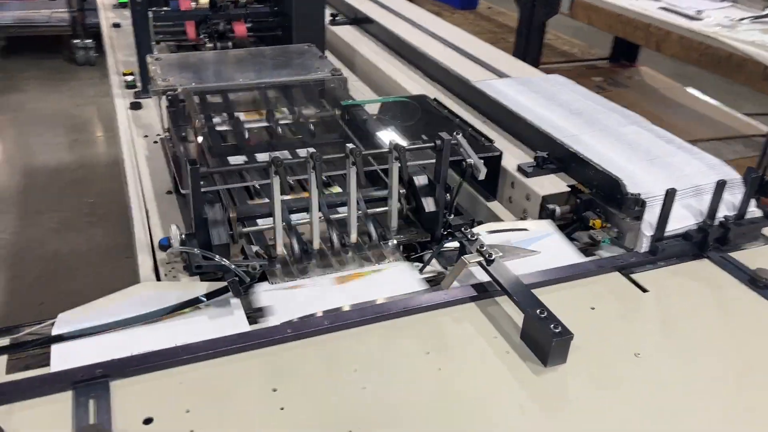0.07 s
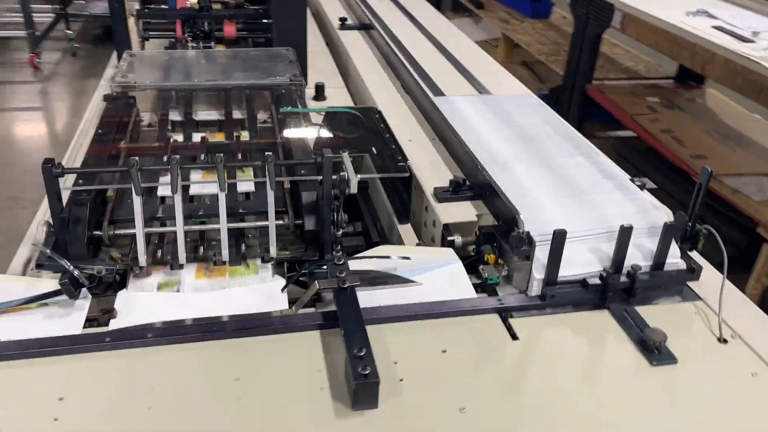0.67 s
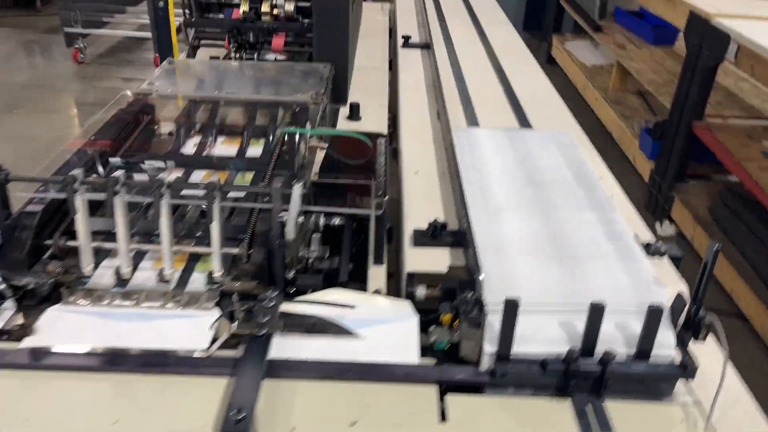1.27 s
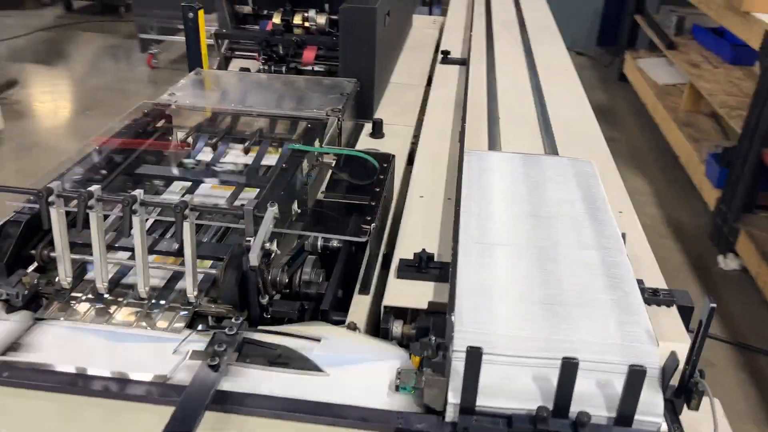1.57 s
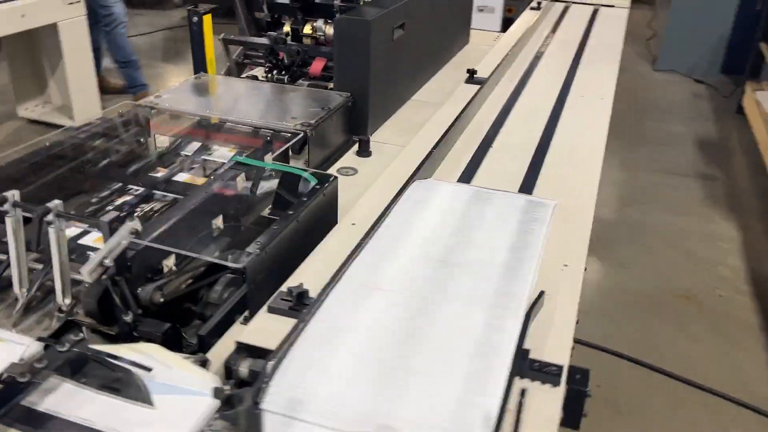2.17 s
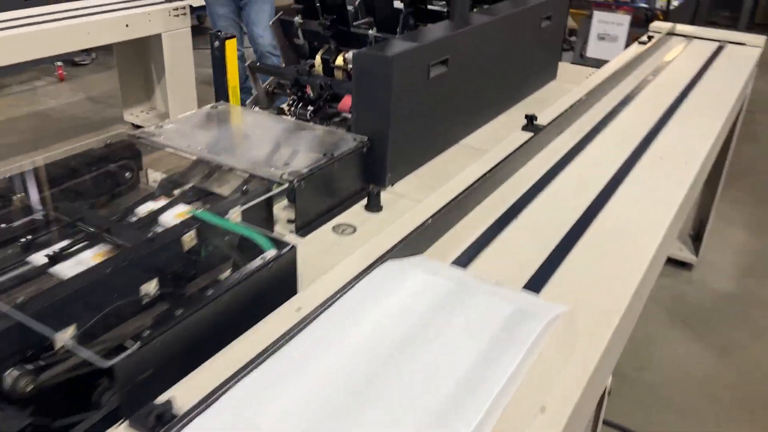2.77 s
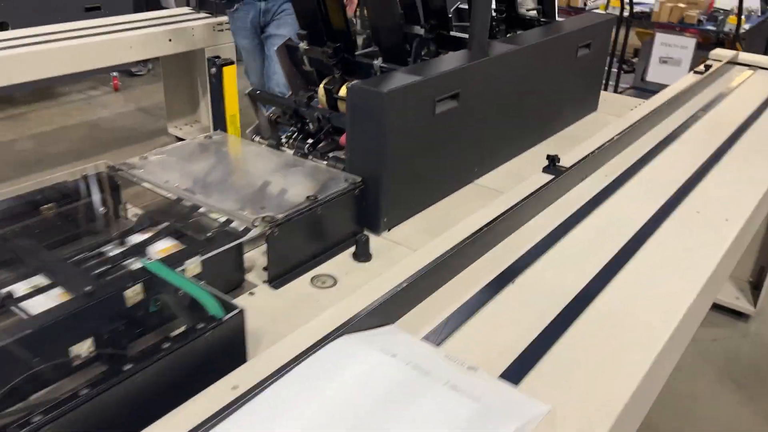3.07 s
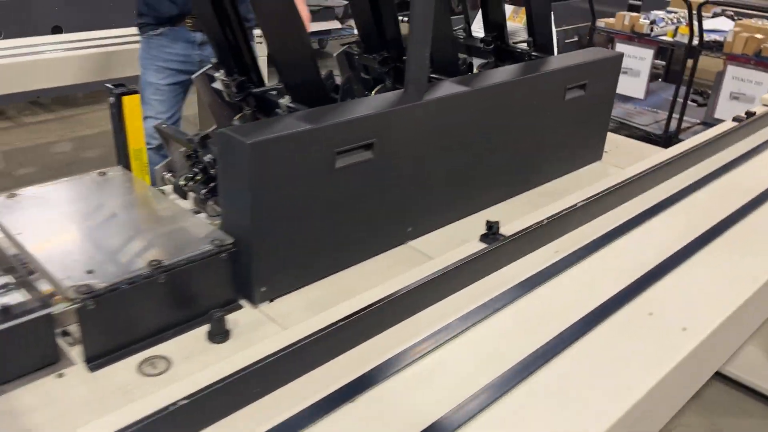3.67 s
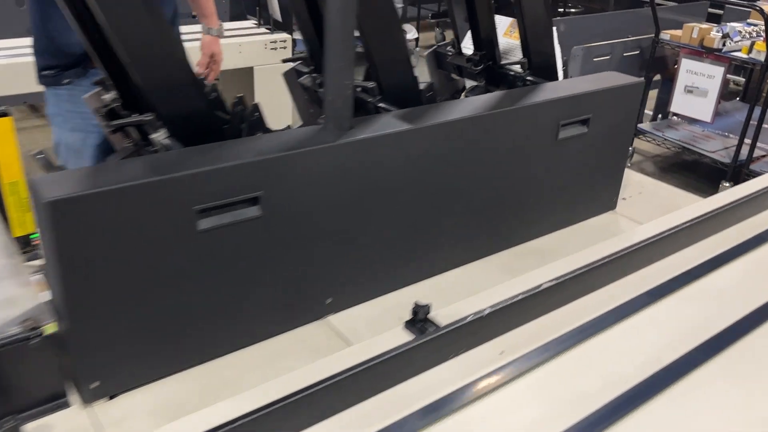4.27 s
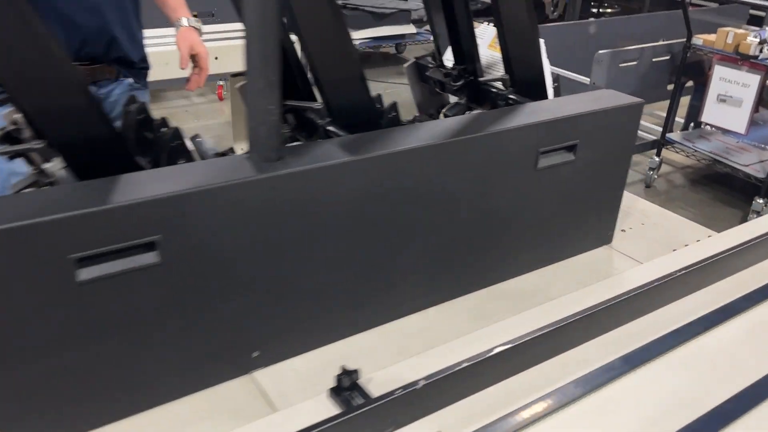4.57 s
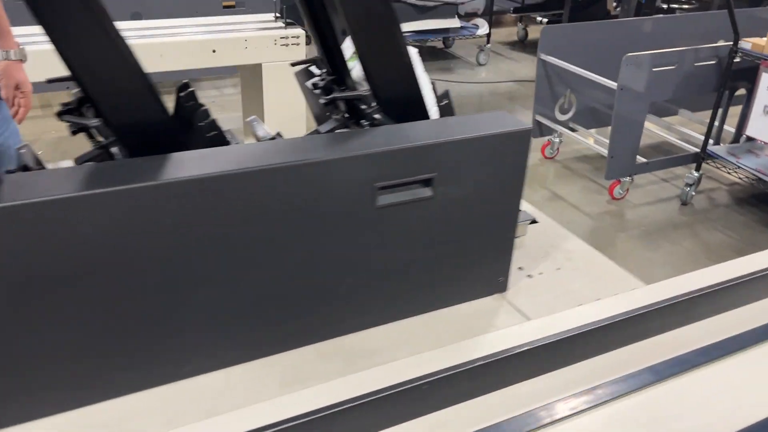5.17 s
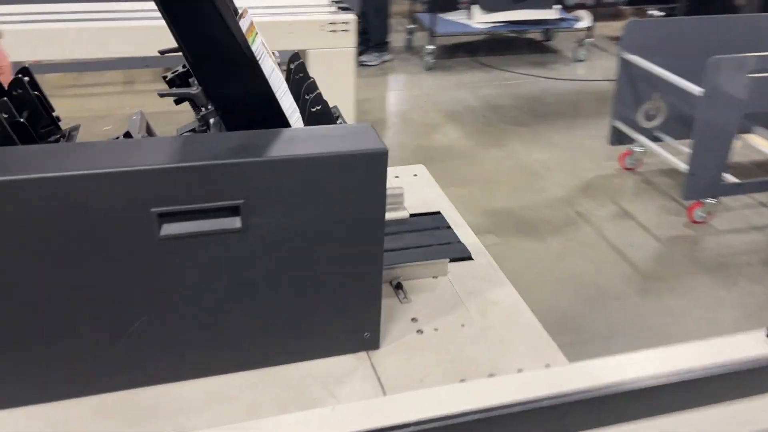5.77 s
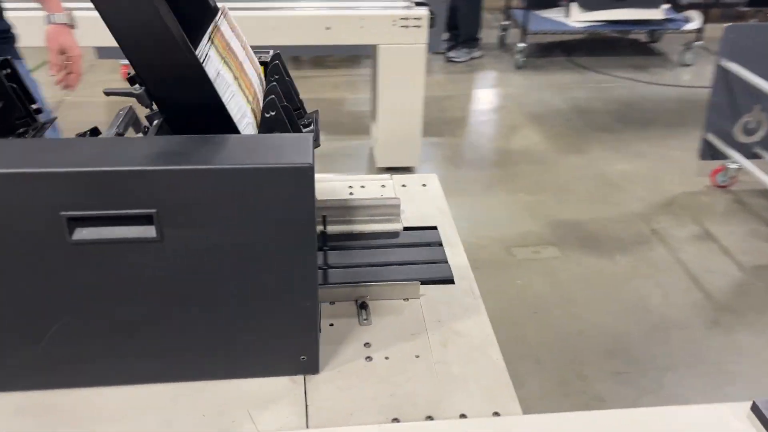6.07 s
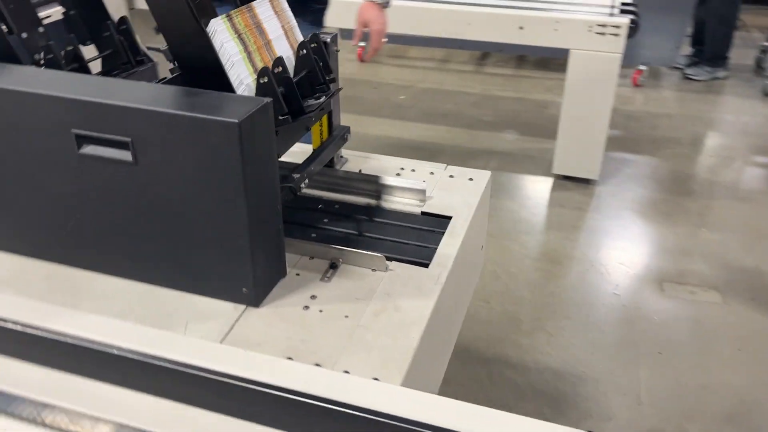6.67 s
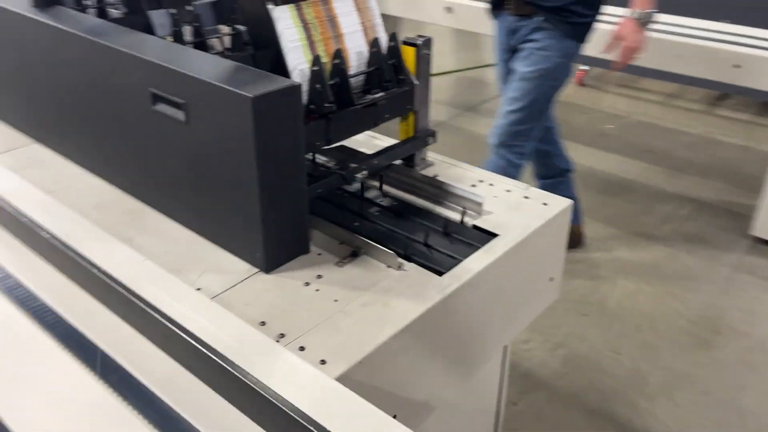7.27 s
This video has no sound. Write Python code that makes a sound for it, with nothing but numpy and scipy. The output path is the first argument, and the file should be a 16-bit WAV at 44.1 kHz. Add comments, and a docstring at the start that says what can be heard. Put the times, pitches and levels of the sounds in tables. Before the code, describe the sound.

Close, sharp metallic clacks repeat in a fast, regular rhythm as an envelope machine works, mixed with hollow knocks, thumps, rustling sheets and ticking chains. The drive roars and hums underneath throughout. The stereo microphone travels away from the busiest part along covered sections, so the paper fades and the clacking softens and loses brightness, while small steel parts jingle and the workshop reverberates a little more.

```python
"""Grippers and levers of an envelope inserting machine clack at nearly three cycles a second.
In each cycle cams knock on the cabinet and the frame thumps; the main lever hits hardest every third.
Sheets rustle, and chains and rollers rattle over the roar and hum of the drive in a large workshop.
A stereo microphone starts close to the inserting station and moves two metres along the covered
feeders, so the clatter grows fainter and duller, with more of the hall in it."""
import sys
import numpy as np
from scipy import signal
from scipy.fft import rfft, irfft
from scipy.io import wavfile

SR = 44100
rng = np.random.default_rng(int(sys.argv[2]) if len(sys.argv) > 2 else 0)


def store_wav(level_fs):
    """Save 16-bit WAV to argv[1]."""
    pcm = np.round(np.clip(np.atleast_2d(level_fs), -1, 1) * 32767)
    wavfile.write(sys.argv[1], SR, pcm.T.astype(np.int16))


N = 331632
TIME, BIN_HZ = np.arange(N) / SR, np.arange(N // 2 + 1) * SR / N


def from_db(db):
    """Decibels to gain."""
    return 10 ** (np.asarray(db) / 20)


def rms_one(x):
    """Scale to rms 1."""
    return x / np.sqrt(np.mean(x ** 2) + 1e-20)


def with_energy_of(x, envelope):
    """Scale each row of x to the energy of an envelope."""
    return x * np.sqrt(np.sum(envelope ** 2) / np.sum(x ** 2, axis=-1, keepdims=True))


def per_bin(points):
    """A table over log frequency, read at every FFT bin."""
    hz, value = np.transpose(points)
    return np.interp(np.log(np.maximum(BIN_HZ, 1)), np.log(hz), value)


def coloured(x, spectrum):
    """Shape x by a spectrum; rms 1."""
    return rms_one(irfft(rfft(x) * from_db(per_bin(spectrum)), N))


def band(x, low_hz, high_hz, order=2):
    """Causal band-pass."""
    return signal.sosfilt(signal.butter(order, [low_hz, high_hz], "band", fs=SR, output="sos"), x)


def resonate(x, hz, width_hz):
    """One resonance with gain 1 at its peak."""
    r = np.exp(-np.pi * width_hz / SR)
    feedback = [1, -2 * r * np.cos(2 * np.pi * hz / SR), r * r]
    return signal.lfilter(np.array([1, 0, -1]) * (1 - r * r) / 2, feedback, x + 1e-18)


def drift(rate_hz):
    """Random wander with rms 1, mostly slower than rate_hz."""
    return rms_one(irfft(rfft(rng.standard_normal(N)) / (1 + (BIN_HZ / rate_hz) ** 2), N))


def add(out, s, sound):
    """Mix a sound in from time s on."""
    start = round(s * SR)
    first, last = max(start, 0), min(start + sound.shape[-1], N)
    out[:, first:last] += sound[:, first - start:last - start]


# The walk along the machine: t/s, place/m
WALK = [(0, 0.36), (1.5, 0.76), (3, 1), (4.5, 1.95), (6, 2.43), (7.52, 2.33)]
def microphone_m(s):
    """Where the microphone is at time s."""
    return np.interp(s, *np.transpose(WALK))


def distance_db(s, place_m, reach_m):
    """A part is 3 dB down one reach away from its place, then falls with distance."""
    return -10 * np.log10(1 + ((microphone_m(s) - place_m) / reach_m) ** 2)


def along_walk(nearest_db, place_m, reach_m):
    """Gain of a steady source at the moving microphone."""
    return from_db(nearest_db + distance_db(TIME, place_m, reach_m))


def shade_db(s, covers_from_m=1.62, db_per_m=3.5):
    """Loss of treble as the microphone moves along the covers."""
    return -db_per_m * np.maximum(microphone_m(s) - covers_from_m, 0)


def shaded(x, above_hz=3400):
    """The covers dull a steady sound."""
    dull = signal.sosfiltfilt(signal.butter(2, above_hz, fs=SR, output="sos"), x)
    return dull + from_db(shade_db(TIME)) * (x - dull)


# Likeness of the microphone's two ports: f/Hz, coherence
PORT_LIKENESS = [(50, .995), (90, .987), (180, .96), (350, .945), (700, .66), (1000, .7), (1400, .5),
                 (1900, .68), (3300, .58), (5300, .62), (7000, .72), (8400, .97), (10000, .85),
                 (12000, .96), (14000, .76)]
# Phase of the left port ahead of the right: f/Hz, lead/rad
PORT_LEAD = [(450, 0), (750, .7), (1200, .6), (1520, 2.3), (1800, .2), (3200, 1.1), (5000, .6),
             (5800, -1.0), (6600, -1.1), (8200, -3.0), (11300, -6.2), (12800, -6.5), (15000, -9.3)]
# Left port over right: f/Hz, level/dB
PORT_BALANCE = [(100, 0.5), (700, -.5), (1100, 2), (1500, -2), (2000, 1.5), (3500, 1.5), (4800, 4.5),
                (6200, 0.3), (9000, -0.5)]
def two_ports(pair):
    """A common and an unrelated row become left and right: partly alike, out of step in the treble."""
    common, apart = rfft(pair)
    alike = per_bin(PORT_LIKENESS)
    mid, side = np.sqrt((1 + alike) / 2) * common, np.sqrt((1 - alike) / 2) * apart
    lean = from_db(per_bin(PORT_BALANCE) / 2) * np.exp(1j * per_bin(PORT_LEAD) / 2)
    return irfft(np.array([(mid + side) * lean, (mid - side) / lean]), N)


# Hall tail over direct sound, rising away from the station: t/s, level/dB
HALL_SHARE = [(0, -14), (3, -14), (5, -10.5), (7.52, -7.5)]
def hall(x, t60_s=0.43):
    """The workshop answers each blow with a diffuse, duller tail."""
    t = np.arange(SR) / SR
    tail = band(rng.standard_normal((2, SR)), 80, 7000, order=1) * from_db(-60 * t / t60_s) * (t > .008)
    sent = from_db(np.interp(TIME, *np.transpose(HALL_SHARE))) * x
    return signal.fftconvolve(sent, with_energy_of(tail, np.ones(1)), axes=1)[:, :N]


def reflections(x, echo_db=-11.5, longest_s=.015, shift_s=.001, count=8):
    """Covers and table top return close echoes, whose delays shift as the microphone moves."""
    out = x
    for k, lag in enumerate(rng.uniform(.002, longest_s, count)):
        delay = np.round((lag + shift_s * drift(.3)) * SR).astype(int)
        out = out + (-1) ** k * from_db(echo_db) * x[:, (np.arange(N) - delay) % N]
    return rms_one(out)


# Panels, rails and rods heard all along the machine: f/Hz, width/Hz, level/dB
PANELS = [(59, 10.4, -2.5), (139, 7, -17), (227.8, 7.6, -2.5), (294.6, 5, -10.5), (459.4, 8.2, -10),
          (1080, 280, -9), (1400, 94, -13.5), (1517, 110, 0), (1694, 31, -4.5), (2030, 26, -13),
          (2560, 170, -20), (3880, 1100, -13.5)]
def frame(x):
    """The machine's metalwork rings along, adding its resonances."""
    return x + sum(from_db(db) * resonate(x, hz, width_hz) for hz, width_hz, db in PANELS)


# Rails and brackets heard only close up: t/s, half span/s, f/Hz, width/Hz, level/dB
NEARBY_PARTS = [(.3, .9, 1330, 180, -11), (1.8, 0.68, 182, 35, -2), (2.25, 0.35, 1090, 169.5, -7),
                (2.8, 0.63, 4090, 700, -4), (2.899, 0.22, 950, 130, -6), (3.5, 0.48, 3770, 300, -19),
                (4.35, 0.57, 620, 220, -10), (4.65, 0.43, 2790, 382, -7), (4.65, 0.31, 3710, 218, -12),
                (4.7, 0.27, 6150, 221, -15), (6.301, 0.51, 394, 59.6, -5), (3.6, 0.67, 202, 30, -7),
                (5.25, .5, 119.8, 50.3, -10), (5.5, 0.38, 2170, 450, -18), (6.9, 0.34, 3720, 160, -9)]
def passing_parts(x):
    """Each part adds its ring while the microphone goes by."""
    return x + sum(from_db(db) * np.exp(-((TIME - s) / span_s) ** 2) * resonate(x, hz, width_hz)
                   for s, span_s, hz, width_hz, db in NEARBY_PARTS)


# Drive tones: f/Hz, level/dB at the start of the walk, level/dB at its end, width/Hz
DRIVE_TONES = [(120.4, -43.5, -33.5, 0.81), (136.1, -39, -40, 4.96), (240.6, -45, -41, 1.56),
               (264, -39, -39, 3.94), (357.7, -33, -39.5, 6.29), (509, -52, -42.5, 3.2),
               (596.5, -54, -40.5, 4), (804, -48, -42, 1.47), (844, -53, -45.5, 2.95),
               (906, -58, -43.5, 1.36), (1320, -52, -41, 2.8)]
def drive_hum(waver=0.601):
    """Motor, pump and gear tones waver in pitch and level."""
    out = np.zeros((2, N))
    for hz, start_db, end_db, width_hz in DRIVE_TONES:
        phase = 2 * np.pi * (hz * TIME + np.cumsum(waver * width_hz * drift(9.82)) / SR)
        gain = from_db(np.linspace(start_db, end_db, N) + 1.25 * drift(4.4))
        out += gain * np.sqrt(2) * np.array([np.sin(phase), np.cos(phase)])
    return out


# Spectrum of the drive: f/Hz, relative level/dB
ROAR_SPECTRUM = [(25, -38), (40, -31), (55, -7.5), (85, -4), (125, -2), (172, -3.5), (244, -2.5), (320, -1),
                 (370, -2.5), (430, 0.5), (510, -6.5), (640, -11.5), (900, -13), (1700, -51)]
def drive_roar():
    """The drive's low noise carries over the whole walk."""
    roar = coloured(rng.standard_normal((2, N)), ROAR_SPECTRUM)
    return along_walk(-25, place_m=0.18, reach_m=5) * roar


def rattle(spectrum, per_s, spread_db, q, rush_db, low_hz, high_hz, count=16):
    """Random ticks excite a bank of brief resonances, over a smooth rush."""
    born = rng.random(N) < per_s * from_db(3 * drift(15)) / SR
    ticks = born * from_db(spread_db * np.minimum(rng.exponential(1, N), 4))
    at, rings = np.flatnonzero(born), 0
    for hz in np.geomspace(low_hz, high_hz, count):
        strikes = np.zeros((2, N))
        strikes[:, at] = ticks[at] * rng.standard_normal((2, len(at)))
        rings = rings + resonate(strikes, hz, hz / q)
    rush = coloured(rng.standard_normal((2, N)), spectrum)
    return rms_one(coloured(rings, spectrum) + from_db(rush_db) * rush)


# Spectrum of the rollers: f/Hz, relative level/dB
ROLLER_SPECTRUM = [(320, -5.5), (550, -2.5), (739, -1.5), (895, -1.5), (1120, -3.5), (1490, -3.5),
                   (1610, -5.5), (1730, -4), (2400, -10), (3120, -12), (5280, -120)]
def rollers():
    """Roller bearings tick in the midrange, nearest at the start of the walk."""
    ticks = rattle(ROLLER_SPECTRUM, per_s=250, spread_db=4, q=29, rush_db=1.5, low_hz=554, high_hz=2413)
    return along_walk(-30.3, place_m=0, reach_m=1.57) * reflections(ticks)


# Spectrum of the chains: f/Hz, relative level/dB
CHAIN_SPECTRUM = [(1700, -17), (2200, 1.5), (3200, 3.5), (3800, 2), (5000, 0.5), (6200, 2.5), (8200, -3.5),
                  (11000, -1), (13500, -2), (15500, -23)]
def chains():
    """Chain links tick brightly at the station, duller behind the covers."""
    ticks = rattle(CHAIN_SPECTRUM, per_s=380, spread_db=1.5, q=25, rush_db=2.5,
                   low_hz=2078, high_hz=13600)
    return along_walk(-31, place_m=0.68, reach_m=1.38) * shaded(reflections(ticks))


def paper(clump_db=8, clump_hz=22, grain_db=4):
    """Envelopes slide through the station, rustling in uneven clumps, each register on its own."""
    rustle = 0
    for low_hz, high_hz in [(1900, 3150), (3800, 7900), (8500, 11300)]:
        hiss = rms_one(band(rng.standard_normal((2, N)), low_hz, high_hz))
        rustle += hiss * from_db(clump_db * np.minimum(drift(clump_hz), 2) + grain_db * drift(400))
    return along_walk(-39.5, place_m=0.63, reach_m=0.47) * shaded(rms_one(rustle))


# Load on the main lever over three cycles, light, heavy, middling: level/dB, delay/s
LOAD_ROUND = [(-5.5, .002), (-1, -.002), (-2, .0025)]
def every_cycle(table, cycle_s=0.352, uneven_s=.001, uneven_db=2.5):
    """Repeat a cycle's contacts under changing load and distance: rows of t/s, level/dB, the rest."""
    rows = []
    for cycle in range(int(N / SR / cycle_s) + 1):
        load_db, load_s = LOAD_ROUND[cycle % len(LOAD_ROUND)]
        for phase_s, place_m, reach_m, share, db, *sound in table:
            s = cycle * cycle_s + phase_s + share * load_s + uneven_s * rng.standard_normal()
            heard_db = db + share * load_db + distance_db(s, place_m, reach_m)
            rows.append([s, heard_db + uneven_db * rng.standard_normal(), *sound])
    return np.array([row for row in rows if row[0] < N / SR])


def with_catches(contacts, catches, window_s=.012):
    """A harder blow takes the place of the regular contacts around its moment."""
    catches = np.array(catches)
    taken = np.abs(contacts[:, :1] - catches[:, 0]).min(axis=1) < window_s
    out = contacts.copy()
    out[taken, 1] = -120  # dB, silent
    return np.vstack([out, catches])


def blows(table, gain_db, rise_s, scatter_db, low_hz, high_hz):
    """Each blow rings one main mode of a part; a band of noise stands for its other modes."""
    out, t = np.zeros((2, N)), np.arange(SR // 4) / SR
    for s, db, hz, decay in table:
        force = np.minimum(t / rise_s, 1) * np.exp(-np.maximum(t - rise_s, 0) / decay)
        main = force * np.sin(2 * np.pi * (hz * t + rng.random((2, 1))))
        others = with_energy_of(band(force * rng.standard_normal((2, len(t))), low_hz, high_hz), force)
        blow = with_energy_of(main + from_db(scatter_db) * others, force)
        add(out, s - rise_s / 2, from_db(db + gain_db) * blow)
    return out


# Sheet edges near the station: t/s, level/dB, f/Hz, decay/s
FLICKS = [(.231, -26, 10200, .005), (.906, -28, 11000, .006), (.954, -25, 11000, .005),
          (1.497, -30, 10900, .004), (1.974, -26, 10800, .006), (2.467, -26, 11000, .003),
          (2.911, -30, 11300, .002), (3.168, -24, 11000, .003), (3.492, -27, 11030, .003),
          (3.519, -25, 10800, 0.0033), (3.790, -29, 10700, 0.0042)]
def sheet_flicks():
    """Edges of sheets flick as they spring free."""
    return blows(FLICKS, gain_db=0, rise_s=0.0026, scatter_db=0, low_hz=9400, high_hz=12800)


# Light contacts all along the walk: t/s, level/dB, f/Hz, decay/s
TAPS = [(.606, -20, 2520, 0.0078), (.874, -23, 1760, 0.0088), (1.233, -26, 1310, 0.012),
        (1.473, -20, 1350, .008), (1.576, -24, 1245, 0.0062), (2.286, -25, 2540, 0.0066),
        (2.344, -29, 2120, .006), (2.386, -24, 1900, .006), (2.697, -27, 2300, .006),
        (2.723, -22, 1090, 0.0079), (3.236, -21, 1186, 0.0074), (3.963, -32, 2500, 0.008),
        (4.243, -31, 1160, 0.0088), (4.551, -33, 2700, .016), (4.582, -31, 1050, .007),
        (4.821, -28, 2270, 0.0086), (4.903, -36, 2610, .01), (4.923, -32, 1970, 0.015),
        (5.364, -35, 2200, .009), (5.553, -28, 2050, 0.017), (5.694, -34, 1160, .009),
        (6.233, -29, 2320, 0.015), (6.746, -31, 1510, .012), (6.931, -31, 2370, .009),
        (7.082, -29, 1260, .009), (7.448, -32, 1840, .012), (7.495, -31, 1880, .01)]
def guide_taps():
    """Levers and guides tap between the strokes."""
    return blows(TAPS, gain_db=-2.5, rise_s=0.00307, scatter_db=-0.5, low_hz=1000, high_hz=3200)


# Steel parts near the station: t/s, level/dB, f/Hz, decay/s
CLINKS = [(1.147, -20, 1720, 0.011), (2.203, -18.5, 1530, .006), (2.684, -14, 6420, 0.0044),
          (2.881, -10, 3630, .001)]
def steel_clinks():
    """Small struck parts ring at one pitch each."""
    return blows(CLINKS, gain_db=-3, rise_s=0.00051, scatter_db=-19, low_hz=1000, high_hz=7000)


# Fingers at the conveyor's end: t/s in the cycle, place/m, reach/m, load share, level/dB, f/Hz, decay/s
JINGLES = [(.072, 2.1, 0.36, 0.015, -29, 3800, 0.03), (.229, 2.5, 0.44, 0.0046, -33, 3630, 0.03)]
# Harder shakes, close to the microphone: t/s, level/dB, f/Hz, decay/s
HARD_JINGLES = [(6.556, -23, 3650, 0.02), (6.605, -25, 3790, 0.016), (6.752, -25, 3850, 0.021),
                (6.915, -25, 3640, .025), (7.107, -22.5, 3950, 0.017), (7.262, -25, 3630, 0.016)]
def finger_jingles():
    """Light steel fingers are shaken in every cycle and jingle."""
    shakes = with_catches(every_cycle(JINGLES), HARD_JINGLES)
    return blows(shakes, gain_db=-10.5, rise_s=.001, scatter_db=0, low_hz=3570, high_hz=4140)


# Strokes on the frame: t/s in the cycle, place/m, reach/m, load share, level/dB, f/Hz, decay/s
THUMPS = [(.03, 2.25, .4, 0, -21.5, 102, .018), (.205, 0.11, 0.39, 0.0084, -18, 147.4, 0.035),
          (.274, .45, .4, 0.0066, -14.5, 120, 0.016)]
def frame_thumps():
    """The strokes shake the frame's low modes."""
    strokes = every_cycle(THUMPS)
    thumps = blows(strokes, gain_db=-8.5, rise_s=0.00875, scatter_db=-2.5, low_hz=48.3, high_hz=167)
    return band(thumps, 37, 630)


# Cams along the cabinet: t/s in the cycle, place/m, reach/m, load share, level/dB, f/Hz, decay/s
KNOCKS = [(.014, 1.5, 1.2, 0, -19, 370, 0.031), (.066, -0.5, 0.74, 0.84, -13, 398, 0.024),
          (.069, 5.5, 0.58, 0.9, -12, 364, 0.017), (.095, 8, 2.5, 0.54, -19.5, 354, 0.012),
          (.15, -0.5, 0.4, 0.42, -10, 272, 0.0065), (.27, -0.5, 1.1, 0.058, -11, 290, 0.0045),
          (.258, 2, 1, 0, -21.5, 265, 0.015)]
# Heavier knocks, as heard at the microphone: t/s, level/dB, f/Hz, decay/s
HEAVY_KNOCKS = [(.419, -5, 392, 0.0078), (.432, -17.5, 239, .05), (.620, -10, 346, 0.0083),
                (.622, -13, 246, .024), (.776, -6, 378, 0.0048), (.793, -13, 241, 0.022),
                (.86, -10.5, 294, .006), (.980, -11, 280, 0.016), (1.072, -10.5, 377, 0.0094),
                (1.175, -19, 227, 0.028), (1.312, -14, 276, .02), (1.475, -5, 355, 0.011),
                (1.504, -13, 417, 0.02), (1.672, -10.5, 275, 0.014), (1.828, -11.5, 409, 0.031),
                (2.02, -10.5, 402, 0.013), (2.185, -16.5, 400, 0.014), (2.525, -12.5, 412, 0.014),
                (3.257, -13.5, 390, 0.0088), (3.603, -9.5, 353, 0.013), (3.632, -10.5, 364, 0.01),
                (3.795, -17.5, 240, .018), (3.804, -17, 375, 0.013), (4.135, -16, 372, .03),
                (4.218, -16, 236, .02), (4.336, -15.5, 265, .014), (4.639, -12, 364, .016),
                (4.829, -14, 283, 0.018), (4.922, -12, 419, 0.017), (5.722, -9, 344, 0.017),
                (5.730, -13.5, 260, 0.027), (6.2, -16, 255, 0.012), (6.258, -14.5, 406, 0.013),
                (6.405, -13, 350, 0.014), (6.756, -14, 429, 0.01), (6.776, -13.5, 358, 0.014),
                (7.055, -18, 280, .022), (7.109, -12.5, 374, 0.018)]
def cabinet_knocks():
    """Cams knock on the cabinet panels, which ring briefly."""
    knocks = with_catches(every_cycle(KNOCKS), HEAVY_KNOCKS)
    return blows(knocks, gain_db=-7, rise_s=0.0051, scatter_db=-7.5, low_hz=224, high_hz=470)


# Further modes of a struck steel part: multiple of its pitch, level/dB
PART_MODES = [(.61, -9.5), (.81, -3.5), (1.18, -7.5), (1.48, -10)]
def steel_ring(contacts, hz, cover_db, width_hz=300):
    """A part rings at its pitch; the covers shade its further modes and its broad noise."""
    modes = sum(from_db(db) * resonate(contacts, hz * multiple, width_hz) for multiple, db in PART_MODES)
    broad = from_db(-6) * band(contacts, 2200, 7500)
    return resonate(contacts, hz, width_hz) + from_db(0.64 * cover_db) * (modes + broad)


# Grippers, levers and paper stops: t/s in the cycle, place/m, reach/m, load share, level/dB,
# strike/dB, swell/s, decay/s, f/Hz, body/dB, snap/dB (strike, body and snap are offsets to the level)
CLACKS = [(.003, .8, 0.76, 0.41, -29.5, -1, .003, 0.023, 4500, 5, -8),
          (.064, 0.36, 0.67, 0.32, -23, -1, 0.005, 0.0095, 4100, 3.5, -9),
          (.069, 1.43, 0.28, 1, -24, -2, 0.0045, 0.019, 3100, 1, -21),
          (.089, 0.5, 0.69, 0.5, -26, -11, 0.0057, 0.017, 3800, 5.5, -12),
          (.128, 0.97, 0.22, 0.062, -28, 2, 0.00085, 0.0099, 4360, -4, -7),
          (.166, 0.22, 0.32, 0.0032, -22, -6, 0.0033, 0.015, 4600, -3.5, 2.5),
          (.178, 0.57, 0.22, 0, -22.5, -11, 0.0061, 0.016, 3500, 0.5, -16),
          (.201, 0.066, 0.43, 0.013, -21.5, 3, 0.0027, 0.0086, 4640, 0.5, 5),
          (.219, 0.33, 0.41, 0.037, -20.5, 3, 0.0019, 0.013, 6600, -19, -12),
          (.228, 3, 0.46, 0.029, -33.5, 3, 0.004, 0.015, 3820, 3, -19),
          (.233, 0.31, 0.87, 0.012, -26.5, -4, 0.0055, 0.007, 4400, -18, -14),
          (.251, 0.83, .85, 0, -25, -8, 0.002, 0.022, 4400, -36, 2),
          (.269, 0.17, 0.33, 0, -20, 0, 0.0084, 0.014, 4540, -4, -3),
          (.262, 1.42, 0.17, 0.043, -27, -5, 0.0069, 0.029, 2780, -7, -15),
          (.275, 1.4, 1.4, 0.011, -43, -24, .007, 0.061, 3930, 7, -12),
          (.314, 0.29, 0.6, 0, -29.5, -2, 0.0015, 0.0033, 3200, 3, -13),
          (.328, 0.53, 1.6, 0.065, -33.5, -7, 0.0018, 0.012, 3650, 8.5, 3)]
# A part catches and lands harder: t/s, level/dB, strike/dB, swell/s, decay/s, f/Hz, body/dB, snap/dB
CATCHES = [(0.233, -16, -4, .002, .005, 4500, -10, -6), (.266, -17, -4, 0.0065, 0.017, 3180, -1, -1.5),
           (.417, -16.5, -6, 0.0036, 0.0063, 4700, 2, -2), (.556, -22, -4, .002, 0.0056, 6330, -12, -2),
           (.620, -19, -6, 0.0078, 0.013, 4500, -2.5, 4.5), (.776, -22, -8, 0.0047, 0.0085, 3370, 3, -6),
           (.938, -23, -3, .002, .005, 4670, -8, 2), (.977, -18, -4, .003, 0.01, 3200, -2.5, 3.5),
           (1.273, -17, -5, 0.0015, 0.014, 6800, -14, 0.5),
           (1.331, -13.5, -6, 0.0074, 0.0075, 5040, -3.5, -6),
           (1.471, -14, 6, 0.0011, 0.0049, 5600, -6, -24),
           (1.586, -18.5, -5, 0.0058, 0.0089, 3770, 0, -7.5), (1.627, -17, -3, 0.0033, 0.015, 6600, -4, -9),
           (1.678, -16, -7, 0.0042, 0.01, 4600, -5, -4), (1.828, -20, -4, 0.0057, 0.01, 5260, 1, -8),
           (1.937, -21.5, -4, 0.0044, 0.0077, 4600, 2, -9), (1.994, -19, -3, 0.0022, 0.0045, 5200, -10, -6),
           (2.028, -13, -2, .0008, 0.0075, 4740, -3.5, -7), (2.201, -20, 0, 0.0023, 0.0062, 5540, -3, -17),
           (2.341, -20, -2, .008, 0.0077, 4200, -16, 1), (2.378, -15.5, 6, .0004, 0.0094, 4900, -2.5, -5),
           (2.526, -19, -3, 0.0057, 0.0052, 4300, 0, -15), (2.553, -21, -3, 0.0034, 0.0059, 5460, -1, -14),
           (2.685, -16.5, 2, 0.0011, .008, 6560, -9, 4), (2.733, -15.5, -4, 0.0022, 0.0073, 4900, -17, -5),
           (2.818, -22.5, -3, .002, 0.0051, 4400, 1, -14), (2.881, -20.5, 9, 0.00059, 0.004, 3830, -2, -14),
           (3.036, -20.5, -1, 0.00071, 0.0077, 6540, -7, 0),
           (3.085, -18.5, -1, 0.0045, 0.0098, 3430, -19, 0),
           (3.233, -23, -3, 0.0024, 0.0056, 3710, -5, -12), (3.397, -21, -3, 0.0051, .007, 7000, -11, -6),
           (3.440, -21, -4, 0.0055, .01, 3770, -1, 0), (3.581, -20.5, -5, .004, 0.013, 3800, -2, -14),
           (3.607, -24, -3, 0.0019, .006, 4000, -4, -15), (3.770, -19, -3, 0.0019, .006, 4100, -9, -10),
           (3.938, -25, 9, .0006, 0.022, 4250, 1, -15), (4.09, -24.5, -2, .002, 0.0067, 4300, -10, -12),
           (4.138, -23.5, -2, 0.0077, 0.013, 4720, -6, -11), (4.496, -26.5, -2, .012, 0.016, 2700, -7, -12),
           (4.637, -24, 3, 0.0022, 0.022, 3670, -0.5, -8), (4.663, -32, -3, 0.004, 0.016, 2670, 4, -12),
           (4.823, -27, 0, .001, 0.0088, 2500, -4, -16), (4.994, -27, -2, 0.0025, 0.014, 4050, -4, -12),
           (5.694, -24, -2, .002, 0.018, 4560, -0.5, -17), (6.063, -31, 0, 0.0025, .009, 4500, -4, -13),
           (6.556, -27.5, -5, .003, 0.0083, 4600, 1, -16), (6.605, -32, -5, .004, 0.015, 3800, 8, -13),
           (6.912, -25.5, -4, 0.0022, .011, 4620, 1, -14), (7.106, -30, -5, 0.0022, 0.012, 3930, -2, -14),
           (7.261, -28, -4, .003, 0.010, 4470, -6, -14)]
def gripper_clacks(approach_s=0.00059, strike_s=0.0035, uneven_db=2, table_until_m=0.6):
    """A part slides home, strikes and chatters: tiny contacts excite its modes, mounting and a snap."""
    out, lead = np.zeros((2, N)), SR // 20
    t = np.arange(-lead, SR // 6) / SR
    for s, db, strike_db, swell, decay, hz, body_db, snap_db in with_catches(every_cycle(CLACKS), CATCHES):
        cover_db = shade_db(s)
        chatter = np.exp(np.where(t < 0, t / swell, -t / decay))
        strike = np.exp(np.where(t < 0, t / approach_s, -t / strike_s))
        force = np.hypot(chatter, from_db(strike_db - 6.5 + 1.3 * cover_db) * strike)
        contacts = force * rng.standard_normal((2, len(t)))
        contacts *= from_db(uneven_db * np.repeat(rng.standard_normal(len(t)), 20)[:len(t)])
        # In front of the station, the feed table hides the ringing steel and its own top sounds along.
        over_table_m = np.maximum(table_until_m - microphone_m(s), 0)
        ring = steel_ring(contacts, hz, cover_db), -0.5 - 15 * over_table_m
        body = band(contacts, 790, 3550), body_db - 3 + 17 * over_table_m
        snap = band(contacts, 4700, 10800), snap_db - 5 + 5.8 * cover_db
        clack = sum(from_db(db + part_db) * with_energy_of(x, force) for x, part_db in (ring, body, snap))
        add(out, s - lead / SR, clack)
    return out


def scene():
    """Blows, hall tail and running noise ring through the metalwork and join the hum at the microphone."""
    hits = cabinet_knocks() + frame_thumps() + steel_clinks() + finger_jingles()
    hits += gripper_clacks() + guide_taps() + sheet_flicks()
    running = drive_roar() + rollers() + chains() + paper()
    machine = passing_parts(frame(hits + hall(hits) + running))
    return two_ports(machine + drive_hum())


def record(dry, ceiling=2.7, cutoff_hz=15750):
    """The tallest peaks are rounded and the top is cut steeply."""
    rounded = ceiling * np.tanh(dry / ceiling)
    return signal.sosfilt(signal.ellip(12, .2, 90, cutoff_hz, fs=SR, output="sos"), rounded)


dry = scene()
out = record(dry)
store_wav(out)
```